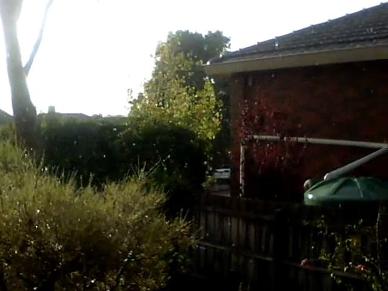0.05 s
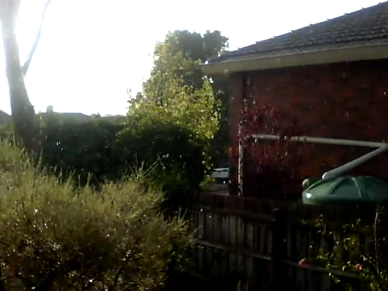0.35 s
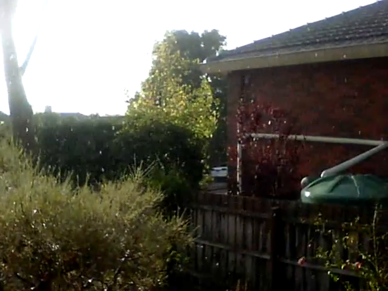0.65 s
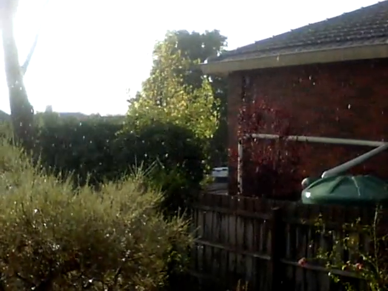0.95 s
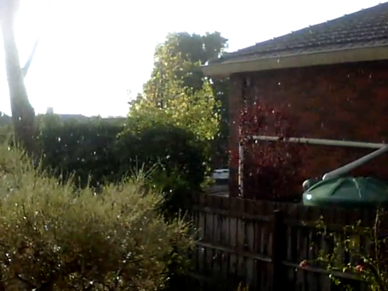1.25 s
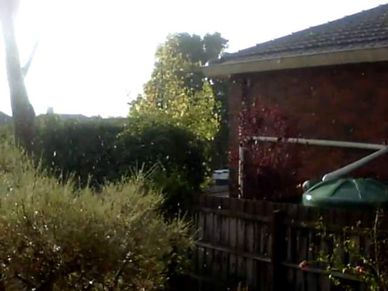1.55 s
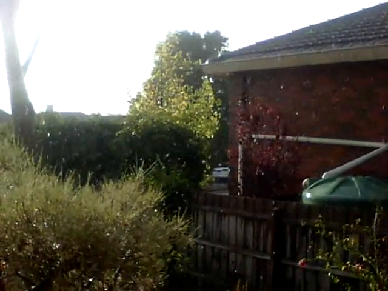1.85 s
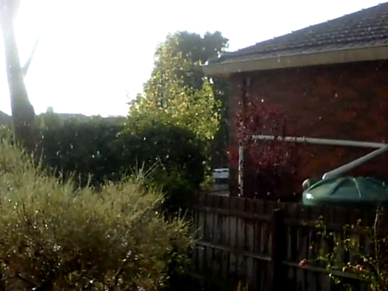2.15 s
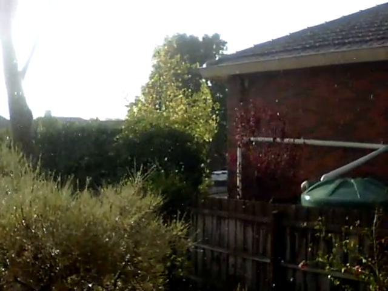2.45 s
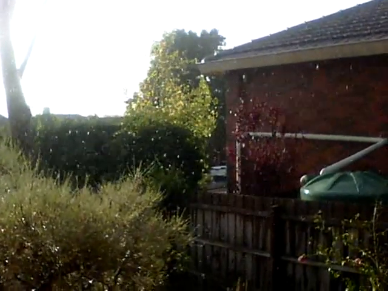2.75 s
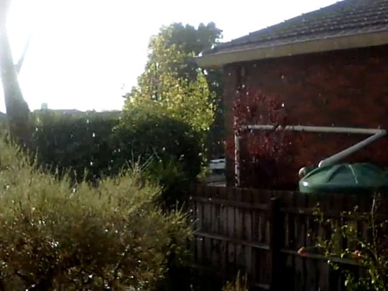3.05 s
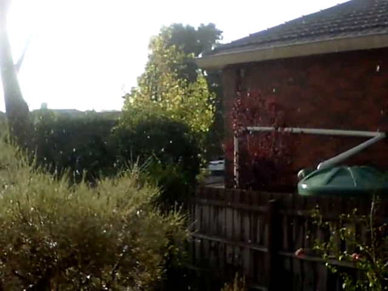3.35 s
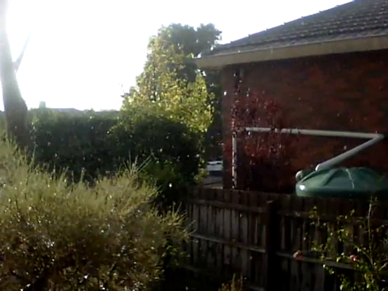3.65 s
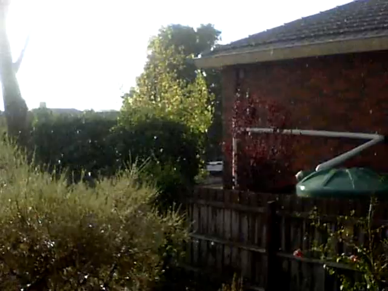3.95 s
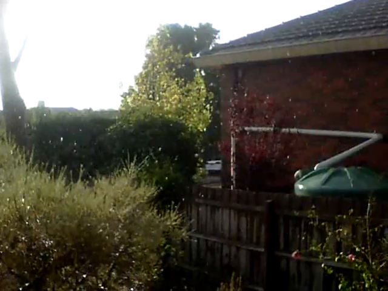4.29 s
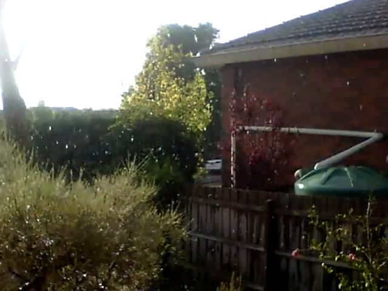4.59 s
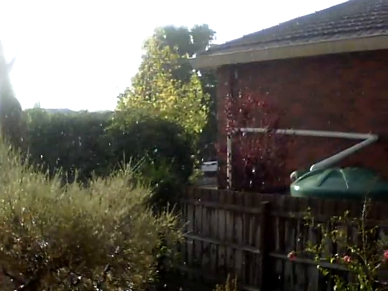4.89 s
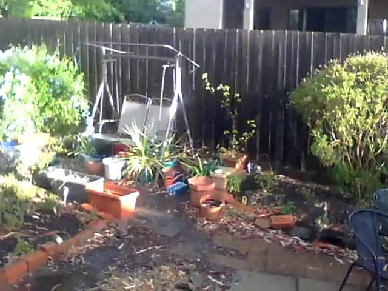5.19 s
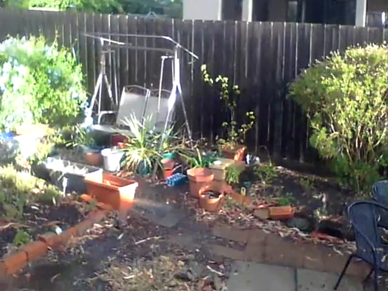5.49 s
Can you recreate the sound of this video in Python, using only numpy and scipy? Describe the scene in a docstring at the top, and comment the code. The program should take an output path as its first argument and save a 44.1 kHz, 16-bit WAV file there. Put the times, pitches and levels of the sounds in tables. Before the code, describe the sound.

Heavy rain pours on a garden beside a house from the start, a dense, steady hiss with fine ticking on leaves and hollow drumming on the roof and gutter. A low air rumble lies underneath, with soft gusts pressing on the microphone. A dull, deep thump comes at about 0.2 seconds, another at 3.1, and two weaker ones at 4.3 and 5, each echoing briefly off the walls. Big close drops crack on leaves throughout, most clearly around 1.1, 1.6, 2.4, 3.6 and 3.9 seconds. Now and then a heavy drip rings briefly on something hollow, at varying pitches. At about 5.2 seconds the downpour cuts abruptly to much lighter, fluttering rain in a back yard. A hollow drip, two fat, dull plops around 5.4 seconds and a couple of sharp ticks follow just before the end.

```python
"""A garden beside a brick house, in heavy rain. Countless far drops merge into a wash, nearer ones tick
on leaves, and roof and gutter drum hollowly. Dull thumps echo off the walls over a bed of low air rumble
and gusts. Near the end, a hard cut to a back yard with much lighter rain and two fat plops.
Big close drops crack on leaves and heavy drips ring hollow things in both places."""
import sys
import numpy as np
from scipy import signal
from scipy.fft import rfft, irfft, next_fast_len
from scipy.io import wavfile

SR = 44100
rng = np.random.default_rng(int(sys.argv[2]) if len(sys.argv) > 2 else 0)


def dump(signal):
    """Clip the signal to [-1, 1] and save it as 16-bit WAV at the path in sys.argv[1]."""
    limited = np.clip(np.atleast_2d(signal).T, -1, 1)
    pcm = np.round(limited * 32767).astype(np.int16)
    wavfile.write(sys.argv[1], SR, pcm)


N = 243784
TIME = np.arange(N) / SR
YARD_CUT_S = 5.209

# Strength of the downpour. Each row: time in seconds, level of the far wash in dB.
RAIN_LEVELS = [(0, -33), (0.7, -31.5), (1.7, -32.1), (2.8, -32.5), (3.4, -33.9), (4.0, -33), (5.2, -33)]
# Colours of the noise beds. Each row: frequency in Hz, relative spectral level in dB.
WASH_COLOUR = [(80, -12.5), (140, -4), (280, -3.5), (410, -8), (540, -4.5), (800, -5), (1000, -4),
               (1500, -6.5), (2200, -5.5), (2900, -8.5), (4600, -10), (5800, -23), (6800, -45), (7600, -57)]
RUMBLE_COLOUR = [(25, -16.5), (45, -0.5), (62, 2), (80, -5), (100, -8.5), (140, -21.5), (250, -47)]
BREEZE_COLOUR = [(12, 0.5), (22, 1.5), (35, -1.5), (55, -13.5), (110, -41.5)]
YARD_COLOUR = [(20, -1), (70, -5), (160, -10), (300, -13), (700, -18.5), (1500, -20), (4600, -23),
               (5800, -34.5), (7200, -45)]
# Resonances kept ringing by the rain: the low ones are roof and gutter drumming hollowly, while several upper
# ones (about 1.2 to 2.2 kHz) add a fine ripple as from a window recess nearby. Each row: pitch in Hz, width in
# Hz, rms level in dB in average rain.
RINGING_MODES = [(189.6, 30, -49), (269.5, 32, -49.5), (500.4, 30, -44.5), (593, 48, -49.5), (650, 40, -47.5),
                 (951, 46, -51), (1028, 90, -49.5), (1172, 84, -48.5), (1398, 62, -50), (1660, 51, -52),
                 (1780, 56, -52.5), (1870, 43, -52), (2060, 100, -49.5), (2205, 80, -50.5)]
# The biggest close drops. Each row: start in seconds, peak in dB before the trim, ring in Hz,
# spray in dB against the crack.
BIG_DROPS = [(1.138, -15, 4900, -18), (1.311, -21, 4400, -6), (1.646, -18, 3470, -13),
             (2.257, -21, 4000, -9), (2.385, -17, 4400, -18), (2.452, -19.5, 4300, -8),
             (3.559, -19.5, 4570, -11), (3.927, -19, 4450, -3), (3.975, -21, 4400, -7),
             (5.005, -21, 3900, -13), (5.343, -29, 2400, -6), (5.475, -22, 4000, -22)]
# Heavy drips on hollow things. Each row: start in seconds, level in dB, pitch in Hz.
HOLLOW_DRIPS = [(0.101, -31.5, 191), (0.50, -28, 2185), (1.33, -30, 506), (2.10, -31, 188),
                (2.41, -32, 267), (4.044, -29, 1014), (4.86, -28.5, 196), (5.282, -34, 480)]
# Dull thumps. Each row: start in seconds, envelope peak in dB.
THUMP_HITS = [(0.161, -4), (3.08, -7), (4.338, -14.5), (4.957, -13)]
# Their returns from the house walls. Each row: delay in seconds, gain in dB.
WALL_ECHOES = [(0.043, -12), (0.080, -15), (0.120, -22.5)]
# Fat drips hitting the ground in the yard. Each row: start in seconds, peak in dB.
YARD_PLOPS = [(5.344, -29.5), (5.401, -26)]
# Gusts on the microphone. Each row: time of the crest in seconds, rise in dB.
GUST_SWELLS = [(0.9, 7), (1.8, 4), (2.5, 5), (3.2, 5), (3.75, 5), (5.1, 5)]


def far_wash(rain_db, flutter_db=0.5, swell_db=0.62):
    """Countless distant drops merge into a hiss that flutters as sheets of rain arrive."""
    return from_db(rain_db + flutter_db * drift(25) + swell_db * drift(4)) * noise(WASH_COLOUR)


def leaf_patter(level_db, per_s=1500, spread_db=1.5, cycles=2.6, clump_db=3.0, tilt_db_per_oct=3.5):
    """Each drop ticks on one of many leaves and dies in a few cycles; small leaves ring highest."""
    pitches_hz = np.geomspace(1100, 5200, num=12)
    per_leaf = per_s / len(pitches_hz) * from_db(clump_db * drift(13))
    ticks = np.zeros(N)
    for hz in pitches_hz:
        leaf = resonate(impacts(per_leaf, spread_db), hz, hz / cycles)
        ticks += from_db(tilt_db_per_oct * np.log2(hz / pitches_hz[0])) * rms_one(leaf)
    return from_db(level_db) * rms_one(soften(ticks))


def roof_drumming(swing_db, per_s=250, spread_db=2.0):
    """Drops keep the resonances ringing, hollow roof and gutter below and a fine ripple higher up, harder when
    the rain is heavier."""
    drum = np.zeros(N)
    for hz, width_hz, db in RINGING_MODES:
        drum += from_db(db) * rms_one(resonate(impacts(per_s, spread_db), hz, width_hz))
    return drum * from_db(swing_db)


def near_drops(trim_db=-2.0, crack_s=0.0012, spray_s=0.016, grain_db=3.0, stray_count=12):
    """A big drop cracks on a leaf, then its spray patters down around it in uneven grains."""
    # Lesser strays fall at random through the downpour, each on a leaf of its own pitch.
    stray_db, stray_spray_db, leaf_hz, spread_oct = -22.5, -12, 4200, 0.2
    strays = [(YARD_CUT_S * when, stray_db, leaf_hz * 2 ** (spread_oct * (2 * leaf - 1)), stray_spray_db)
              for when, leaf in rng.random((stray_count, 2))]
    out, age = np.zeros(N), TIME[:SR // 20]
    for s, db, hz, spray_db in strays + BIG_DROPS:
        splash = np.exp(-age / crack_s) + from_db(spray_db) * np.exp(-age / spray_s)
        grains = rng.choice([-1, 1], len(age)) * from_db(grain_db * rng.standard_normal(len(age)))
        tick = soften(resonate(splash * grains, hz, width_hz=2600))
        start = min(round(s * SR), N)
        out[start:start + len(age)] += (from_db(db + trim_db) * tick / np.abs(tick).max())[:N - start]
    return out


def hollow_drips(contact_s=0.0061, t60_at_500_hz_s=0.24):
    """Heavy drips set gutters, tubs and pots ringing briefly; higher notes die sooner."""
    out = np.zeros(N)
    for s, db, hz in HOLLOW_DRIPS:
        age = np.maximum(TIME - s, 0)
        t60_s = t60_at_500_hz_s * (hz / 500) ** -0.26
        attack = 1 - np.exp(-age / contact_s)
        tail = from_db(db - 60 * np.minimum(age / t60_s, 4))
        out += attack * tail * np.sin(2 * np.pi * hz * age)
    return out


def thumps(boom_hz=55.5, swell_s=0.0075):
    """Something large and hollow booms for about three cycles; the walls send it back."""
    booms = np.zeros(N)
    for s, db in THUMP_HITS:
        age = np.maximum(TIME - s, 0)
        swell = (age / swell_s) ** 2 * np.exp(-np.minimum(age / swell_s, 40))
        booms -= from_db(db) * swell / swell.max() * np.sin(2 * np.pi * boom_hz * age)
    return booms + sum(from_db(db) * np.interp(TIME - delay, TIME, booms) for delay, db in WALL_ECHOES)


def plops(decay_s=0.016):
    """A fat drip lands on the ground with a short, dull splat."""
    out = np.zeros(N)
    for s, db in YARD_PLOPS:
        fade = (TIME >= s) * np.exp(-np.clip((TIME - s) / decay_s, 0, 20))
        splat = resonate(fade * rng.standard_normal(N), hz=170, width_hz=280)
        out += from_db(db) * splat / np.abs(splat).max()
    return soften(out)


def yard_rain(level_db=-37.5, flutter_db=2.0):
    """A fluttering bed of light rain with a little rumble underneath."""
    return from_db(level_db + flutter_db * drift(30)) * noise(YARD_COLOUR)


def air_rumble(rumble_db=-34, breeze_db=-35, waver_db=0.84, lumps_db=1.5, gust_s=0.18, gust_share=0.27):
    """A low outdoor rumble, and deeper lumps where gusts press on the microphone."""
    gust_db = sum(db * np.exp(-((TIME - s) / gust_s) ** 2) for s, db in GUST_SWELLS)
    rumble = from_db(rumble_db + gust_share * gust_db + waver_db * drift(4.2)) * noise(RUMBLE_COLOUR)
    breeze = from_db(breeze_db + gust_db + lumps_db * drift(7.2)) * noise(BREEZE_COLOUR)
    return rumble + breeze


def impacts(per_s, spread_db):
    """Drops land at random: many small ones, a few large."""
    size = from_db(spread_db * np.minimum(rng.exponential(1, N), 4))
    return (rng.random(N) < per_s / SR) * size * rng.choice([-1, 1], N)


def resonate(x, hz, width_hz):
    """A resonance with unity gain at its peak."""
    r = np.exp(-np.pi * width_hz / SR)
    feedback = [1, -2 * r * np.cos(2 * np.pi * hz / SR), r * r]
    return signal.lfilter(np.array([1, 0, -1]) * (1 - r * r) / 2, feedback, x + 1e-18)


def soften(x, top_hz=5200):
    """Roll off the top: a wet impact has little above a few kilohertz."""
    return signal.sosfilt(signal.butter(7, top_hz, fs=SR, output="sos"), x)


def noise(colour):
    """Unit-rms noise of the given colour."""
    hz, db = np.transpose(colour)
    size = next_fast_len(N)
    bins_hz = np.maximum(np.arange(size // 2 + 1) * SR / size, 1)
    gain = from_db(np.interp(np.log(bins_hz), np.log(hz), db)) * (bins_hz > 10)
    return rms_one(irfft(rfft(rng.standard_normal(size)) * gain, size)[:N])


def drift(rate_hz):
    """Smooth random modulation at unit rms, moving mostly slower than rate_hz."""
    hop, run_in = 40, 2000
    r = np.exp(-2 * np.pi * hop * rate_hz / SR)
    slow = signal.lfilter([1], [1, -2 * r, r * r], rng.standard_normal(N // hop + run_in + 2))[run_in:]
    return np.interp(np.arange(N) / hop, np.arange(len(slow)), rms_one(slow))


def from_db(db):
    """Decibels to gain."""
    return 10 ** (np.asarray(db) / 20)


def rms_one(x):
    """Scale to unit rms."""
    return x / np.sqrt(np.mean(x ** 2) + 1e-20)


def scene():
    """The downpour cuts to the yard, with close drops and drips layered over both."""
    rain_db = np.interp(TIME, *np.transpose(RAIN_LEVELS))
    swing_db = rain_db - rain_db.mean()
    patter_db = -39 + 0.44 * swing_db   # the leaves ride only part of the downpour's swing
    downpour = far_wash(rain_db) + leaf_patter(patter_db) + roof_drumming(swing_db)
    garden = downpour + air_rumble() + thumps()
    yard = yard_rain() + plops()
    return (np.where(TIME < YARD_CUT_S, garden, yard) + near_drops() + hollow_drips())[None]


def record(dry):
    """A small mono microphone with a narrow band; its converter rests a little below zero."""
    stop_hz, stop_db, dc_offset = 7350, 56, -0.05
    return dc_offset + signal.sosfilt(signal.cheby2(12, stop_db, stop_hz, fs=SR, output="sos"), dry)


dry = scene()
out = record(dry)
dump(out)
```